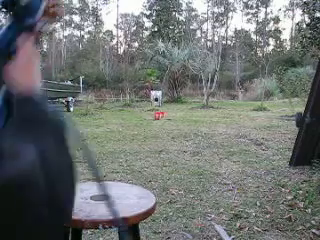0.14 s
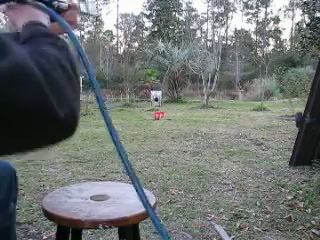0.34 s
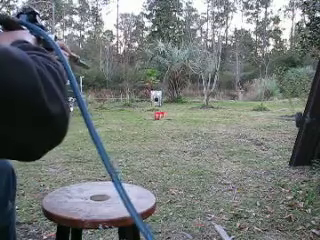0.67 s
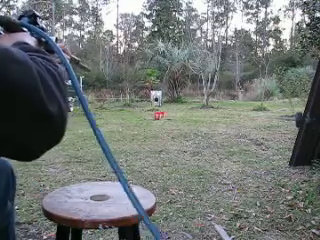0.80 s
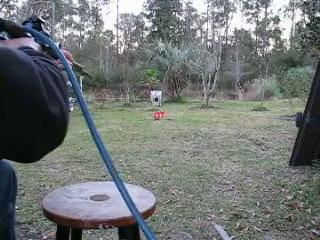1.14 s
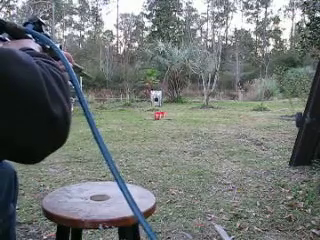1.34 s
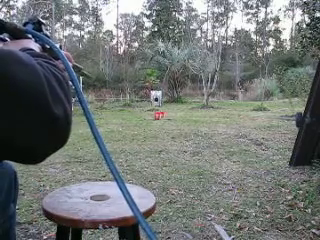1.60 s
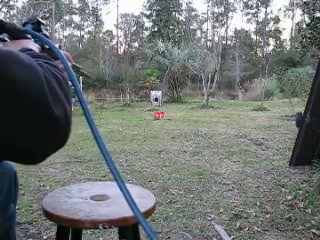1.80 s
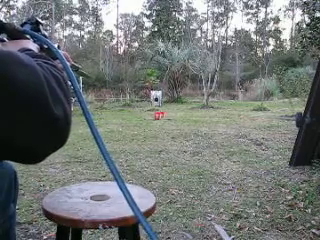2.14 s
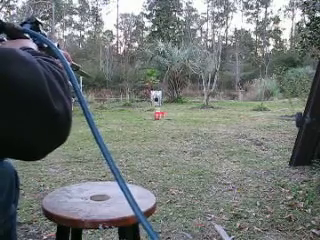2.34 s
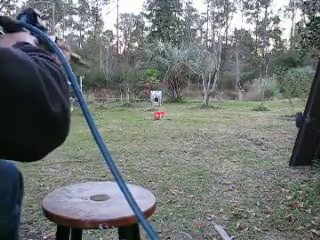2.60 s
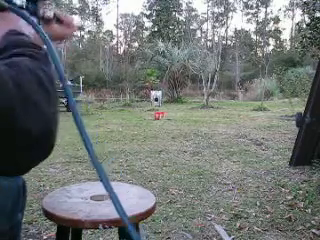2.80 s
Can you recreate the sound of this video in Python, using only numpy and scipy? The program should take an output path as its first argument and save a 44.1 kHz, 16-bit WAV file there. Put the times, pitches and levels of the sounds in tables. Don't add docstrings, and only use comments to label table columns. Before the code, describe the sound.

Air cannon shot: a piercing jet of air, a hollow thump, then echoes across a wooded yard.

```python
import sys
import numpy as np
from scipy import signal
from scipy.fft import rfft, irfft, next_fast_len
from scipy.io import wavfile

SR = 44100
rng = np.random.default_rng(int(sys.argv[2]) if len(sys.argv) > 2 else 0)


def linear_from_db(decibels):
    return 10 ** (np.asarray(decibels, float) / 20)


def master_out(mix):
    frames = np.transpose(np.atleast_2d(mix))
    ceiling = np.clip(frames, -1, 1)
    pcm = np.round(ceiling * 32767).astype(np.int16)
    wavfile.write(sys.argv[1], SR, pcm)


N = 130095
T = np.arange(N) / SR
FIRE_S, JET_END_S = 2.2602, 2.382


def at_hz(points, hz):
    points = np.array(points)
    return np.interp(np.log(hz), np.log(points[:, 0]), points[:, 1])


def over_time(points, **ends):
    return np.interp(T, *np.transpose(points), **ends)


def unit(x):
    return x / np.sqrt(np.mean(x ** 2) + 1e-20)


def bump(centre, width):
    return np.exp(-((T - centre) / width) ** 2)


def drift(rate):
    r = np.exp(-32 * np.pi * rate / SR)
    slow = signal.lfilter([1], [1, -2 * r, r * r], rng.standard_normal(N // 16 + 4002))[4000:]
    return np.interp(np.arange(N) / 16, np.arange(len(slow)), unit(slow))


def ring(x, hz, t60):
    r, w = linear_from_db(-60 / (t60 * SR)), 2 * np.pi * hz / SR
    return signal.lfilter([0, np.sin(w)], [1, -2 * r * np.cos(w), r * r], x + 1e-18)


def peak(x, hz, width):
    r = np.exp(-np.pi * width / SR)
    return unit(signal.lfilter([1, 0, -1], [1, -2 * r * np.cos(2 * np.pi * hz / SR), r * r], x))


def filtered(x, order, hz, kind="low"):
    return signal.sosfilt(signal.butter(order, hz, kind, fs=SR, output="sos"), x)


def stereo(mid, side, alike):
    c = np.clip(alike, -.99, .995)
    return (np.sqrt(1 + c) * mid + np.sqrt(1 - c) * side * [[1], [-1]]) / np.sqrt(2)


# frequency in Hz, left minus right in dB.
MIC_TILT = [(600, 0.8), (2200, -2.3), (4200, 1.1), (8000, -3.5), (12000, 3)]


def noise(spectrum, alike, start=0, patchy_db=1.5, rate=15, loss=0, since=0):
    i = int(start * SR)
    size = next_fast_len(N - i)
    hz = np.fft.rfftfreq(size, 1 / SR) + 1
    gain = linear_from_db(at_hz(spectrum, hz) + at_hz(MIC_TILT, hz) * [[.5], [-.5]])
    full = gain * stereo(*rfft(rng.standard_normal((2, size))), at_hz(alike, hz))
    scale = np.sqrt(np.mean(irfft(full, size) ** 2))
    out = np.zeros((2, N))
    age = np.maximum(T[i:] - since, 0)
    for centre in 22 * 2 ** np.arange(0, 9.6, 1 / 3):
        share = np.clip(1 - 3 * np.abs(np.log2(hz / centre)), 0, 1)
        band = irfft(full * share, size)[:, :N - i]
        loss_db = loss * centre / 1000 * age
        out[:, i:] += band * linear_from_db(patchy_db * drift(rate)[i:] - loss_db)
    return out / scale


def valve():
    rise_s, fall_s, sag_db_per_s = 0.00085, 0.0032, -62
    leak_s, leak_db = .0008, -26
    age = T - FIRE_S
    flow = np.clip(age / rise_s, 0, 1) * linear_from_db(sag_db_per_s * age)
    flow = flow * np.exp(-np.maximum(T - JET_END_S, 0) / fall_s)
    return flow + linear_from_db(leak_db) * np.clip(1 + age / leak_s, 0, 1) * (age < 0) * 2


# time in seconds, pitch in Hz, level in dB.
SHRIEK = [(2.26, 7300, -9), (2.272, 7100, -10), (2.28, 7500, -12), (2.287, 6200, -12), (2.292, 7300, -4),
          (2.2968, 12000, -14), (2.298, 7000, -40), (2.304, 6900, -13), (2.325, 7800, -13),
          (2.335, 6100, -11), (2.38, 6100, -11)]


def shriek():
    wander = .06
    s, hz, db = np.transpose(SHRIEK)
    loose = 1 - bump(2.292, 0.0056)
    pitch = np.interp(T, s, hz) * (1 + wander * loose * drift(437.1))
    apart = (3 * loose * drift(400) + np.pi * (pitch / 11000) ** 3) * [[0], [1]]
    flutter_db = 4.8 * loose * np.array([drift(350), drift(280)])
    return linear_from_db(np.interp(T, s, db) + flutter_db) * np.sin(2 * np.pi * np.cumsum(pitch) / SR + apart)


# frequency in Hz, level in dB per Hz.
JET = [(60, -22), (300, -7.5), (1500, -7.5), (4200, -1), (6200, -0.5), (8500, -2), (10500, -13.5),
       (15600, -13.5)]
# frequency in Hz, left-right likeness.
JET_ALIKE = [(100, -0.12), (600, 0.65), (3500, 0.35), (8000, 0.28), (15000, -0.19)]


def jet():
    jet_db, overtone_db, stall_db, left_choke_db = -5, -30, -12, -18
    rush = linear_from_db(jet_db) * noise(JET, JET_ALIKE, start=2.2, patchy_db=2.5, rate=28) * linear_from_db(2.0 * drift(800))
    out = valve() * (rush + 2 * shriek())
    overtone = peak(rng.standard_normal((2, N)), 13500, 500) * [[1], [.5]]
    out += linear_from_db(overtone_db) * bump(2.355, 0.04) * (T > FIRE_S) * overtone
    out *= linear_from_db(stall_db * bump(2.2813, .0012))
    out[0] *= linear_from_db(left_choke_db * bump(2.2995, .0032))
    return out


def pop():
    return linear_from_db(-9) * np.sin(2 * np.pi * 690 * (T - FIRE_S)) * bump(FIRE_S, 0.00047)


# time in seconds, width in seconds, left push, right push.
GUSTS = [
    (2.2812, .0011, 2.2, -1.8),
    (2.285, .003, -.15, .3),
    (2.296, .003, -.35, -.12),
    (2.306, .004, .22, .08),
]


def gusts():
    return 0.28 * sum(bump(s, width) * [[left], [right]] for s, width, left, right in GUSTS)


# time in seconds, boom in dB, crack in dB.
THUMPS = [
    (2.3761, -1, 4.5),
    (2.3984, -0.5, -4.5),
]
# frequency in Hz, level in dB, 60 dB decay in seconds.
DRUM = [(399.5, -22, 0.67), (449, -16.5, 0.92), (481, -17, 0.81), (533, -17, 0.55), (485, 12.5, 0.035),
        (573, -4, 0.057), (802, -2, 0.047), (1150, 2.5, 0.044)]
# frequency in Hz, level in dB, 60 dB decay in seconds.
SKIN = [(267, -16, 0.023), (1390, -12, 0.042), (2250, -13, 0.11), (2474, -0.5, 0.036), (2697, 2, 0.036),
        (3050, -4, 0.042)]


def drum():
    damp_s = 2.515
    out = np.zeros((2, N))
    for modes, column in ((DRUM, 1), (SKIN, 2)):
        for hz, db, t60 in modes:
            clicks = np.zeros((2, N))
            for row in THUMPS:
                chance_db = rng.normal(0, 1, 2) * hz / 2500
                clicks[:, int(row[0] * SR)] = -linear_from_db(row[column] + db - 12.5 + chance_db)
            if column == 1:
                clicks = signal.lfilter([.1], [1, -.9], clicks)
            out += ring(clicks, hz, t60)
    out = filtered(out, 3, 290, "high")
    waver_db = 2.3 * drift(70) * (T > 2.415)
    return out * linear_from_db(waver_db) / (1 + np.exp((T - damp_s) / .008))


# frequency in Hz, level in dB per Hz.
ECHO = [(80, -34), (250, -16), (1000, -14.5), (2900, -11), (7400, -14.5), (9500, -26), (11000, -35.5),
        (15600, -45)]
# frequency in Hz, left-right likeness.
DIFFUSE = [(100, .99), (400, 0.98), (1000, 0.74), (2200, 0.14), (4500, -0.36), (15000, -0.1)]


def yard_echo():
    level_db, t60_s, air_loss_db_per_s_khz = -18, 1.0, 2.5
    early_db, early_end_s, early_fall_s = -0.5, 2.41, 0.0056
    age = np.maximum(T - JET_END_S, 0)
    scatter = noise(ECHO, DIFFUSE, start=2.3, patchy_db=2.5, rate=11, loss=air_loss_db_per_s_khz, since=2.4)
    early = linear_from_db(early_db) / (1 + np.exp(np.minimum((T - early_end_s) / early_fall_s, 99)))
    return linear_from_db(level_db - 60 * age / t60_s) * scatter * (1 + early)


# frequency in Hz, level in dB per Hz.
TREES = [(100, -21.5), (700, -18), (1000, -8), (1700, -6), (2400, -7), (7600, -14), (10500, -42),
         (15000, -62)]
# frequency in Hz, left-right likeness.
NEAR = [(200, 1), (1000, 0.94), (2200, 0.53), (4500, 0.074), (15000, -0.077)]


def tree_echo():
    level_db, swell_s, rise_s, t60_s = -25.5, 2.652, 0.11, 1.76
    late = T - swell_s
    shape = np.where(late < 0, bump(swell_s, rise_s) + 0.27, 1.34 * linear_from_db(-60 * late / t60_s))
    return linear_from_db(level_db) * shape * noise(TREES, NEAR, start=2.3, patchy_db=1.5, rate=10, loss=5.8, since=2.51)


def echoes():
    return (yard_echo() + tree_echo()) * np.clip((T - 2.35) / 0.034, 0, 1)


# time in seconds, level in dB, pitch in Hz.
SLAPS = [(2.549, -26, 1720), (2.564, -19.5, 1700), (2.5965, -21, 1650), (2.604, -19, 1780),
         (2.61, -15.5, 2250), (2.644, -17, 1670), (2.648, -14, 1555), (2.656, -14.5, 1590),
         (2.666, -19, 1150), (2.716, -22, 2200), (2.731, -21, 1570), (2.75, -24, 1650), (2.763, -22, 1590),
         (2.78, -24, 1285)]


def slaps():
    t60_s, rise_s = 0.025, 0.0011
    out = np.zeros(N)
    for s, db, hz in SLAPS:
        age = np.maximum(T - s, 0)
        out += linear_from_db(db - 60 * age / t60_s) * np.clip(age / rise_s, 0, 1) * np.sin(2 * np.pi * hz * age)
    return out * linear_from_db(np.array([[-1.0], [1.0]]))


# time in seconds, peak in dB, brightness from 0 to 1.
TICKS = [(0.1224, -44, 0.98), (0.1877, -46, 1), (.207, -49, .9), (0.2348, -35, 0.9), (0.3082, -26, 1),
         (0.3311, -14, 0.48), (.3395, -30, 1), (0.3508, -25, 0.1), (.394, -39, .2), (0.416, -31, 0.5),
         (.4215, -34, 0.9), (.4305, -29, 0.3), (.445, -30, 0.3), (.4632, -35, 0.34), (.485, -43, .5),
         (0.5278, -20, 0.54), (0.5368, -20.5, 0.8), (.5405, -23, .9), (0.547, -24, 1), (0.5706, -22, 0.5),
         (.585, -29, 0.4), (0.5928, -26, 0.4), (.602, -28, .5), (.6116, -30, 0.3), (0.675, -30, 0.3),
         (0.689, -35, 0.5), (.7213, -40, 0.6), (0.733, -33.5, 0), (0.8155, -38, 0.1), (0.925, -41.5, 0.2),
         (2.8515, -36.5, 1)]
# frequency in Hz, level in dB, 60 dB decay in seconds.
FITTING = [(1870, -5.5, 0.011), (2550, -5.5, 0.0052), (3150, 1, 0.0082), (4160, -2.5, 0.0057),
           (4920, -3, 0.0038), (5670, 1, 0.0044), (6560, -7.5, 0.0066), (7400, -1.5, 0.01),
           (8300, -8, 0.0042), (10100, -9, 0.0035), (12300, -14, .004), (14100, -25, .003)]


def ticks():
    contact_s, mic_shelf_hz = .001, 9300
    s, db, bright = np.transpose(TICKS)
    out = np.zeros((2, N))
    n = np.arange(199)
    for hz, level_db, t60 in FITTING:
        tilt_db = 12 * (bright - .6) * np.log2(hz / 4000)
        chance_db = 2.0 * rng.normal(0, 1, len(s)) + 2.4 * rng.normal(0, 1, (2, len(s)))
        clicks = np.zeros((2, N))
        clicks[:, (s * SR).astype(int)] = linear_from_db(db + level_db - 16.5 + tilt_db + chance_db)
        contact = .5 * rng.standard_normal(199) * np.exp(-n / SR / contact_s)
        contact = 2.19 * contact / abs(contact @ np.exp(2j * np.pi * hz / SR * n))
        out += ring(signal.lfilter(contact, [1], clicks), hz, t60) * [[1], [np.sign(9500 - hz)]]
    return filtered(out, 1, mic_shelf_hz)


# time in seconds, level in dB.
KNOCKS = [
    (0.3292, -27),
    (.441, -39),
    (0.462, -24),
    (0.5273, -12),
    (0.54, -26),
    (0.5488, -25),
    (0.572, -22),
    (0.584, -32),
    (0.612, -32),
]
# frequency in Hz, level in dB, 60 dB decay in seconds.
KNOCK_BODY = [(1480, -15, 0.022), (1700, 0.5, 0.043), (1880, -17, 0.032)]


def knocks():
    s, db = np.transpose(KNOCKS)
    out = np.zeros(N)
    for hz, level_db, t60 in KNOCK_BODY:
        clicks = np.zeros(N)
        clicks[(s * SR).astype(int)] = -linear_from_db(db + level_db - 7 + rng.normal(0, 2.0, len(s)))
        out += ring(clicks, hz, t60)
    return out


# time in seconds, level in dB.
SCRAPE = [(.33, -42.5), (.36, -52), (.41, -46.5), (.45, -42), (.49, -40.5), (.52, -40.5), (.56, -39.5),
          (.6, -41.5), (.66, -48.5), (.78, -64)]
# frequency in Hz, width in Hz, level in dB.
SCRAPE_BODY = [(1016, 160, -7), (1435, 330, -1), (1750, 230, 1.5), (2680, 820, -6), (3540, 620, -2.5),
               (4720, 790, -7.5), (6140, 1900, -10), (7800, 2450, -12.5), (12800, 2200, -35)]


def scrape():
    grains_per_s, grain_spread_db, scrape_db = 8000, 3.5, 6
    born = rng.random((2, N)) < grains_per_s * linear_from_db(1.8 * drift(150)) / SR
    size_db = grain_spread_db * np.minimum(rng.exponential(1, (2, N)), 5)
    grains = born * linear_from_db(size_db) * rng.choice([-1, 1], (2, N))
    body = np.zeros((2, N))
    for k, (hz, width, db) in enumerate(SCRAPE_BODY):
        mid, side = peak(peak(grains, hz, width), hz, width)
        body += linear_from_db(db) * stereo(mid, side, at_hz(NEAR, hz)) * (-1) ** k
    return linear_from_db(over_time(SCRAPE, left=-120, right=-120) + scrape_db) * unit(body)


# frequency in Hz, level in dB per Hz.
CLATTER = [(300, -34), (620, -25), (780, 0.5), (1100, -6.5), (1550, 1), (2300, -1.5), (3500, -18),
           (8500, -22), (10000, -38), (15500, -34)]
# frequency in Hz, level in dB, 60 dB decay in seconds.
CLATTER_RING = [(776, -32.5, 0.23), (803, -41, 0.36), (1364, -32.5, .15), (1555, -37, 0.37),
                (1970, -36, 0.26), (2200, -38.5, 0.32)]


def clatter():
    clatter_db, t60_s, top_hz = -32, 0.16, 3360
    linger_db, linger_end_s, linger_fade_s = -42, 0.5, 0.054
    rustle = noise(CLATTER, DIFFUSE, patchy_db=1.5, rate=12, loss=-0.56)
    dull = filtered(rustle, 2, top_hz)
    linger = linear_from_db(linger_db) / (1 + np.exp((T - linger_end_s) / linger_fade_s))
    hollow = np.zeros(N)
    for hz, db, t60 in CLATTER_RING:
        level = linear_from_db(db - 60 * T / t60 + 2.5 * drift(29))
        hollow += level * np.sin(2 * np.pi * hz * T + 1.2 * drift(12.3))
    return linear_from_db(clatter_db - 60 * T / t60_s) * dull + linger * rustle + hollow


# frequency in Hz, width in Hz, level in dB.
SLEEVE = [(11700, 400, -72), (11000, 5000, -66)]


def sleeve():
    cloth = sum(linear_from_db(db) * peak(rng.standard_normal((2, N)), hz, width) for hz, width, db in SLEEVE)
    return bump(3.08, 0.31) * cloth


# frequency in Hz, level in dB.
INSECT = [(8270, -69), (9250, -78)]


def insect():
    hush_db = -9
    out = np.zeros((2, N))
    for hz, db in INSECT:
        phase = 2 * np.pi * np.cumsum(hz + 12 * drift(40)) / SR
        out += linear_from_db(db + drift(30)) * np.sin(phase + [[0], [1.0]])
    return out * linear_from_db(hush_db * (T > FIRE_S))


# frequency in Hz, width in Hz, level in dB.
MOTOR = [(58, 6.6, -58), (115.9, 12.3, -55)]


def motor():
    return sum(linear_from_db(db + 1.8 * drift(9.9)) * peak(rng.standard_normal(N), hz, width) for hz, width, db in MOTOR)


# frequency in Hz, width in Hz, level in dB, time in seconds, length in seconds.
PASSING = [
    (174.6, 4.1, -46, 0.53, 0.22),
    (171, 24, -49, 0.93, 0.11),
    (434, 80, -51, 1.0, 0.29),
]


def passing():
    out = np.zeros(N)
    for hz, width, db, s, length in PASSING:
        out += linear_from_db(db) * bump(s, length) * peak(rng.standard_normal(N), hz, width)
    return out


# frequency in Hz, level in dB per Hz.
YARD = [(25, -40), (50, -7), (180, -4.5), (330, -16.5), (900, -11), (2000, -16.5), (4200, -33), (9000, -36),
        (10000, -50.5), (15500, -43)]
# time in seconds, level in dB.
YARD_SWELL = [(0, 2.2), (1.0, 2.25), (1.3, 1.7), (2.2, 1.4)]


def yard():
    yard_db, duck_db, recover_db_per_s = -48.5, -11, 30
    far = linear_from_db(yard_db) * noise(YARD, DIFFUSE, patchy_db=-1.0, rate=5.1) + motor()
    recovery_db = np.minimum(duck_db + recover_db_per_s * (T - JET_END_S), 0)
    duck = np.where(T > FIRE_S, recovery_db, 0)
    return linear_from_db(duck) * (linear_from_db(over_time(YARD_SWELL)) * far + passing() + insect())


def scene():
    shot = jet() + pop() + gusts() + drum() + echoes() + slaps()
    handling = ticks() + knocks() + scrape()
    return shot + handling + clatter() + sleeve() + yard()


def band_limit(x):
    return signal.sosfilt(signal.butter(12, 15700, fs=SR, output="sos"), x)


def record(dry):
    top, first_top, settle_s, top_after_jet = 0.55, .6, .0007, .25
    ceiling = top + first_top * np.exp(-np.abs(T - FIRE_S - .0005) / settle_s)
    ceiling = ceiling + top_after_jet * np.clip((T - 2.372) / 0.0065, 0, 1)
    x = filtered(ceiling * np.tanh(dry / ceiling), 1, 30, "high")
    x = signal.sosfilt(signal.cheby2(12, 60, 16200, fs=SR, output="sos"), x)
    return band_limit(x)


dry = scene()
out = record(dry)
master_out(out)
```